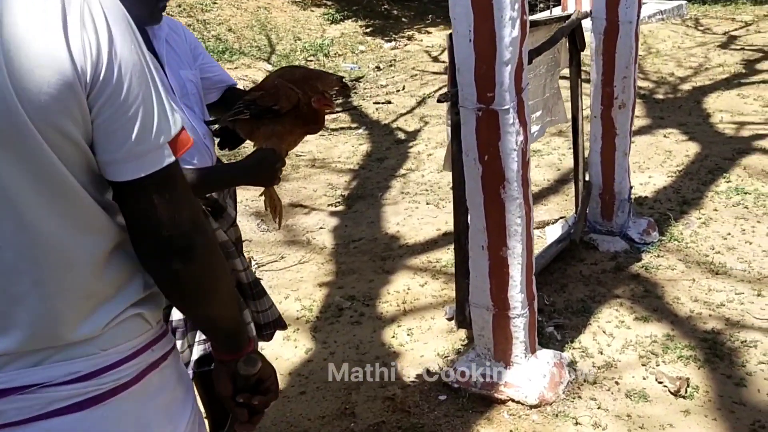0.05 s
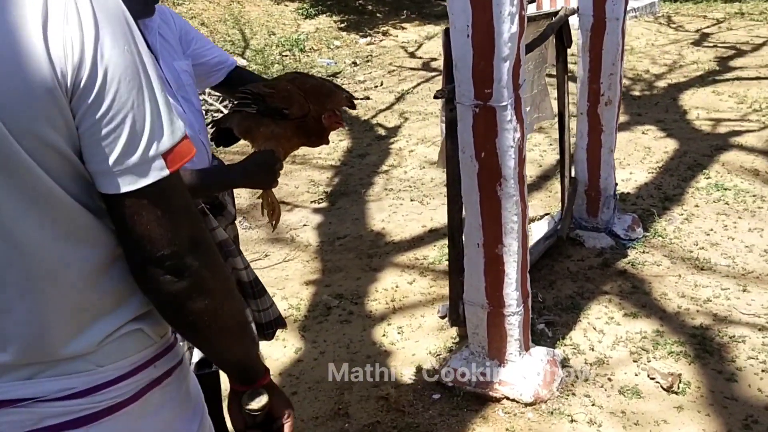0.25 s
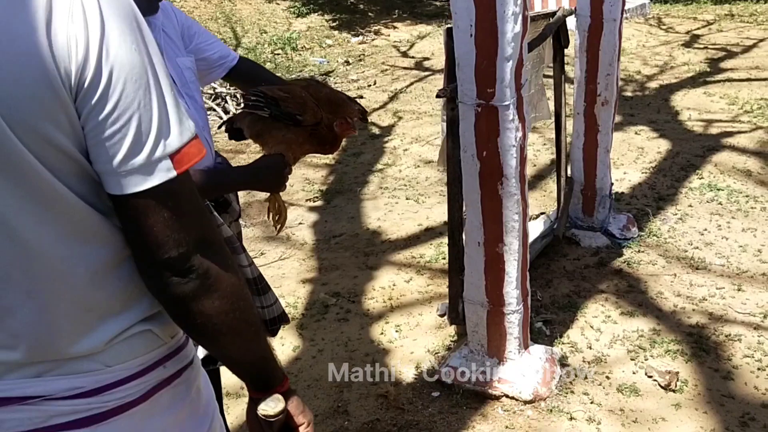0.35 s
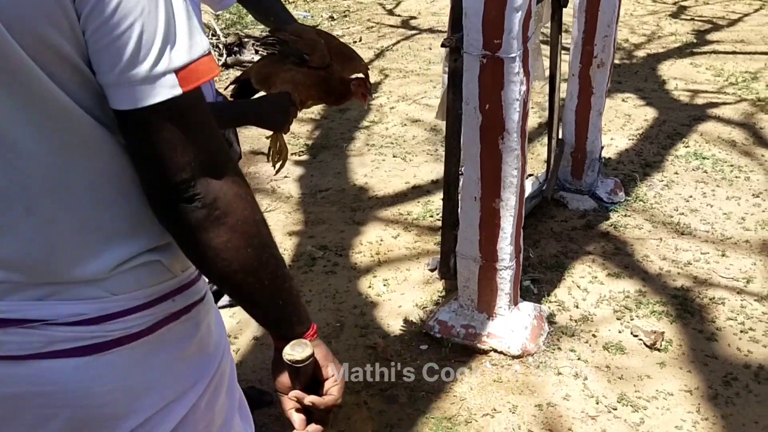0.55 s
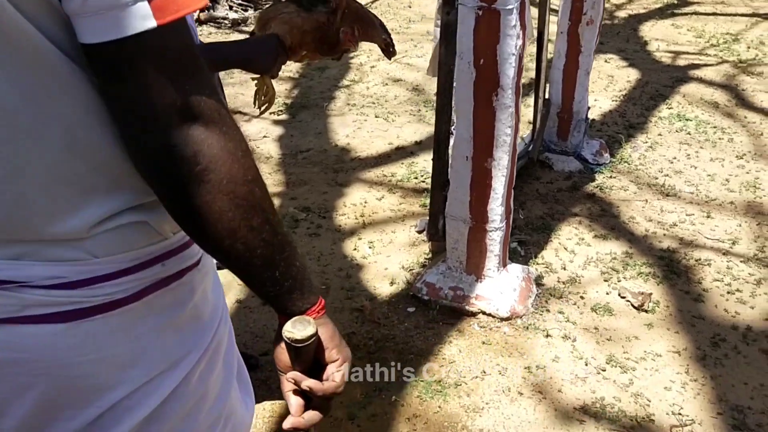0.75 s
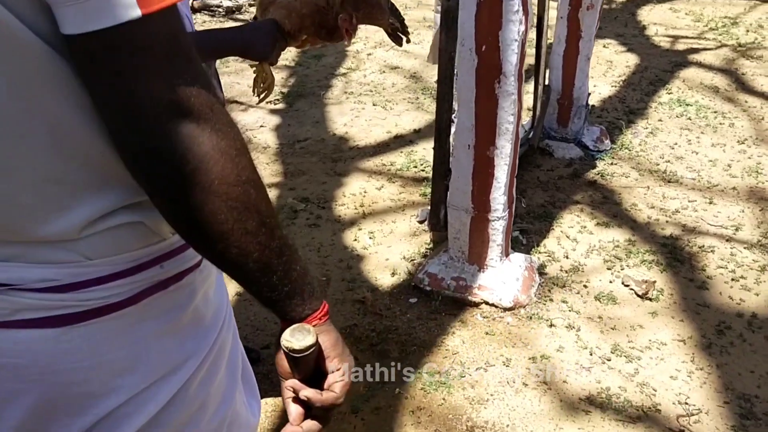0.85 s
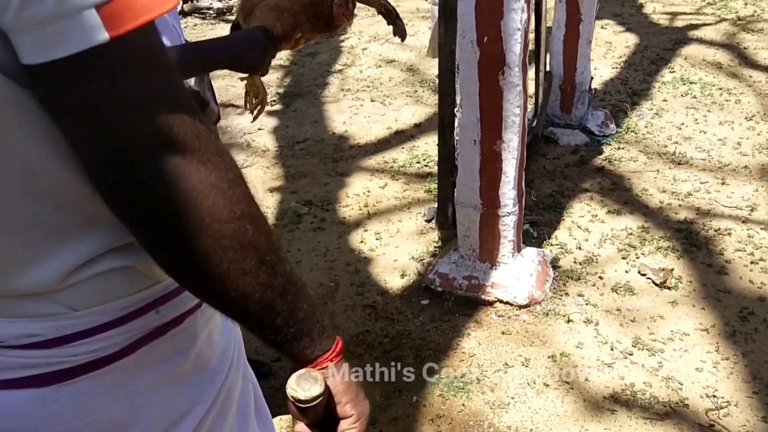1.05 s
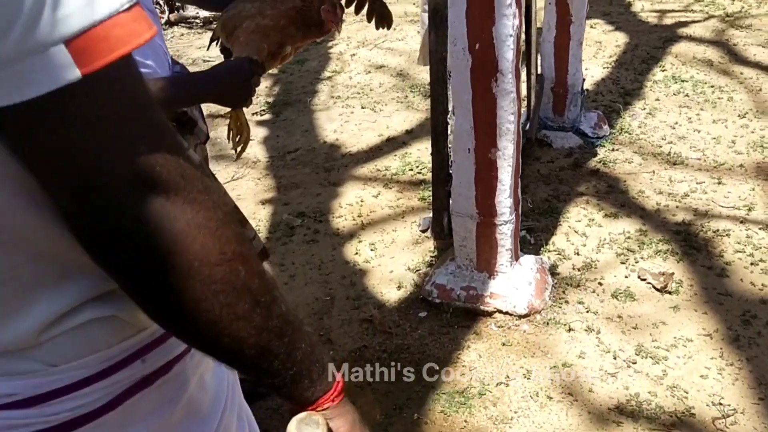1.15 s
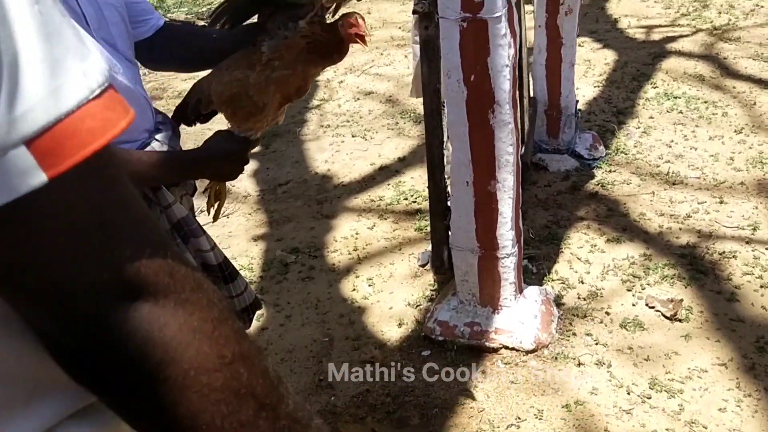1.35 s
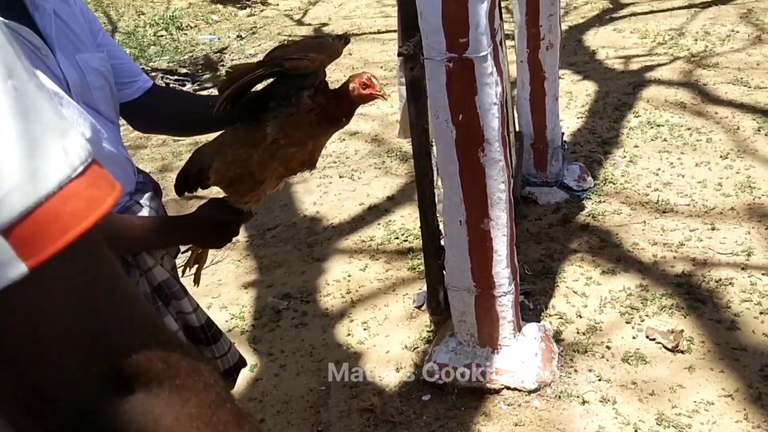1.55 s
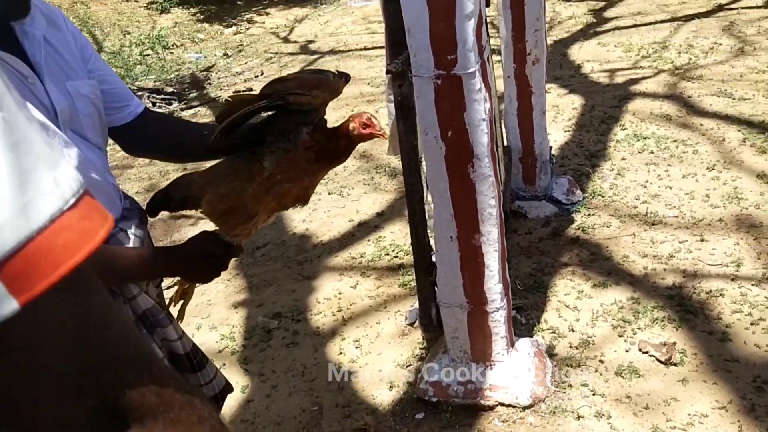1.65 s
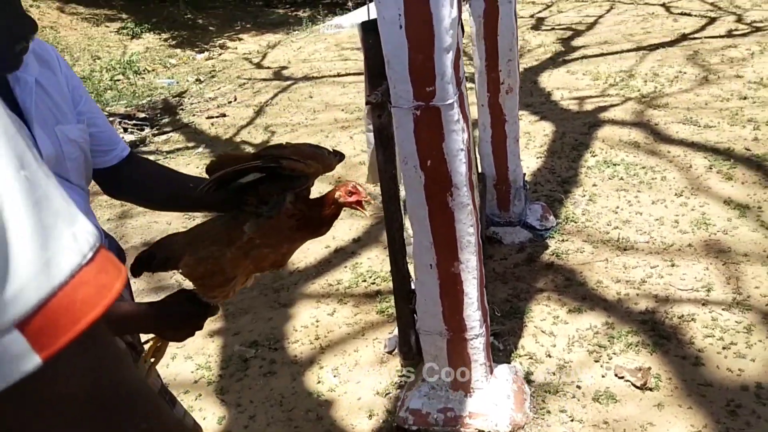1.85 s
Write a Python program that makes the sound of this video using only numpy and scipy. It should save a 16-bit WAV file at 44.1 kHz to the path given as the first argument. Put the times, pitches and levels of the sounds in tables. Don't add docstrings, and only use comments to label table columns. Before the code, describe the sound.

Loud, raspy chicken squawks in quick succession, close up in an open yard with faint echo

```python
import sys
import numpy as np
from scipy import signal
from scipy.fft import rfft, irfft, next_fast_len
from scipy.io import wavfile
from scipy.ndimage import uniform_filter1d

SR = 44100
rng = np.random.default_rng(int(sys.argv[2]) if len(sys.argv) > 2 else 0)


def magnitude_from_level(level_db):
    exponent = np.asarray(level_db, float) / 20
    return 10 ** exponent


def waveform_to_disk(signal):
    frames = np.transpose(np.atleast_2d(signal))
    scaled = np.clip(frames, -1, 1) * 32767
    samples = np.round(scaled).astype(np.int16)
    wavfile.write(sys.argv[1], SR, samples)


N = 83790


def evened(x):
    return x / np.sqrt(np.mean(x ** 2) + 1e-20)


def steady(x):
    return x / np.sqrt(abs(uniform_filter1d(x ** 2, size=1300)) + 1e-12)


def read(points, hz):
    f, value = np.transpose(points)
    return np.interp(np.log(hz + 1), np.log(f + 1), value)


def resonate(x, hz, width):
    turn = np.exp(2j * np.pi * np.cumsum(hz * np.ones(len(x))) / SR)
    r = np.exp(-np.pi * width / SR)
    return 2 * (turn * signal.lfilter([1 - r], [1, -r], x / turn + 1e-18)).real


def resonate_twice(x, hz, width, widen=1):
    return resonate(resonate(x, hz, width), hz, widen * width)


def hush():
    # f/Hz, level/dB per Hz
    hush_spectrum = [(50, -19), (90, -9), (260, -14.5), (666, -6.5), (1300, -7.5), (4300, -13),
                     (5600, -31.5), (15500, -22)]
    # f/Hz, left-right likeness/1
    likeness = [(60, .9), (300, .85), (950, .6), (3800, .2), (15000, .2)]
    frames, hz = N // 256 + 5, np.fft.rfftfreq(1024, 1 / SR)
    a, b, c, d, patches = rng.standard_normal((frames, 513, 5)).T
    patches = uniform_filter1d(patches, size=10, axis=0)
    patches = evened(uniform_filter1d(patches, size=10, axis=1))
    same = np.clip(read(likeness, hz), -1, 1)[:, None]
    left = a + 1j * b
    right = same * left + np.sqrt(1 - same ** 2) * (c + 1j * d)
    z = np.array([left, right]) * magnitude_from_level(read(hush_spectrum, hz)[:, None] + 1.75 * patches)
    return magnitude_from_level(-52.5) * evened(signal.istft(z, nperseg=1024, noverlap=768)[1][:, :N])


def vocal_folds(t, hz, rough, beak, effort_db, wobble, hiss, sizes, octave):
    JITTER, SHIMMER = 0.03647, .45
    TOP_ROUGH = .018
    BLUR_HZ = 151
    BRIGHT_DB, PUFF_DB = 0.89, -5
    SHUT_DB, OPEN_HZ = -0.7, 3000
    OCTAVE_FROM_S, OCTAVE_TO_S, ODD_DB = .245, .305, -20

    wobble = evened(uniform_filter1d(uniform_filter1d(wobble, size=150), size=150))
    turns = np.cumsum(hz * (1 + JITTER * rough * wobble)) / SR
    k = np.arange(1, 24)[:, None]

    blur = rng.standard_normal((len(k), 20000)) + 1j * rng.standard_normal((len(k), 20000))
    poles = np.exp(-2 * np.pi * BLUR_HZ * np.sqrt(k[:, 0] / 2) / SR)
    blur = [(1 - r) ** 1.5 * signal.lfilter([1], [1, -2 * r, r * r], b) for r, b in zip(poles, blur)]
    blur = np.array(blur)[:, -len(t):] * np.sqrt(2)

    broken = np.clip(np.minimum(t - OCTAVE_FROM_S, OCTAVE_TO_S - t) / 0.0037, 0, 1) * octave
    slope_db = BRIGHT_DB * effort_db + SHUT_DB * np.log2(OPEN_HZ / beak)
    sizes_db = ODD_DB * broken * (k % 2) + slope_db * np.log2(k)
    worn = np.minimum(rough + TOP_ROUGH * k, 1)
    phase = 2 * np.pi * (k * turns + rng.random(k.shape))
    partials = (np.sqrt(1 - worn ** 2) + worn * blur) * magnitude_from_level(sizes_db) * np.exp(1j * phase)

    shimmer = 1 + SHIMMER * rough * sizes[turns.astype(int)]
    pulses = partials.real.sum(0) / np.sqrt(len(k) / 2) * shimmer
    return pulses + magnitude_from_level(PUFF_DB + BRIGHT_DB * effort_db) * rough * hiss


def throat_and_beak(drive, beak, effort_db):
    # f/Hz, level/dB
    throat = [(300, -79), (560, -22.5), (1400, -4.5), (3000, 2), (4600, -3.5), (6000, -17), (7400, -15),
              (14000, -50.5)]
    # f/Hz, width/Hz, level/dB
    tract = [(1951, 290, 0.5), (2700, 430, -4.5), (3250, 250, -20.5), (4104, 1160, -10.5)]
    # f/Hz, width/Hz, share/1
    pockets = [(1260, 430, 0.46), (2307, 650, 0.41)]
    BEAK_WIDTH_HZ, BEAK_DB, BEAK_GROWTH = 833, 6.5, 0.33
    SHUT_HZ = 1350

    size = next_fast_len(len(drive) + 2000)
    response = magnitude_from_level(read(throat, np.fft.rfftfreq(size, 1 / SR)))
    body = irfft(rfft(drive, size) * response, size)[:len(drive)]
    for hz, width, db in tract:
        body = body + magnitude_from_level(db) * resonate_twice(drive, hz, width)
    body = body + magnitude_from_level(BEAK_DB + BEAK_GROWTH * effort_db) * resonate_twice(drive, beak, BEAK_WIDTH_HZ)
    opened = np.clip((beak - SHUT_HZ) / 300, 0, 1)
    for hz, width, share in pockets:
        body = body - np.clip(share, 0, 1) * opened * resonate(body, hz, width)
    return steady(body)


def windpipe_whistle(hiss, start_hz, end_hz):
    PIPE_WIDTH_HZ = 48
    PIPE_THROB = 0.13
    tube = np.linspace(start_hz, end_hz, len(hiss))
    whistle = resonate_twice(hiss, tube, PIPE_WIDTH_HZ, 2)
    return (1 - PIPE_THROB) * steady(whistle) + PIPE_THROB * evened(whistle)


def cluck(t, pop):
    u = t / 0.021
    return magnitude_from_level(-35.5) * u * np.exp(1 - u) * evened(resonate_twice(pop, 927, 620))


def squawk(table, pipe, octave=False):
    FULL_DB, PIPE_GROWTH = -13.5, -.25
    s = np.transpose(table)[0]
    t = np.arange(s[0], s[-1] + 0.009124, 1 / SR)
    hz, db, rough, beak = [np.interp(t, s, curve) for curve in np.transpose(table)[1:]]
    rough = np.clip(rough, 0, 1)
    effort_db = np.clip(db - FULL_DB, -25, 5)
    wobble, hiss, sizes, pop = rng.standard_normal((4, 20000))[:, :len(t)]

    drive = vocal_folds(t, hz, rough, beak, effort_db, wobble, hiss, sizes, octave)
    start_hz, end_hz, pipe_db = pipe
    whistle = windpipe_whistle(hiss, start_hz, end_hz)
    voice = throat_and_beak(drive, beak, effort_db)
    voice = voice + magnitude_from_level(pipe_db + PIPE_GROWTH * effort_db) * rough ** 2 * whistle
    fade = np.clip(np.minimum((t - s[0]) / 0.0022, (t[-1] - t) / 0.075), 0, 1)
    return s[0], (voice * magnitude_from_level(db) + cluck(t - s[0], pop)) * fade


def ports(x, tilt, lead):
    size = next_fast_len(len(x) + 400)
    hz = np.fft.rfftfreq(size, 1 / SR)
    half = magnitude_from_level(read(tilt, hz) / 2) * np.exp(.5j * np.interp(hz, *np.transpose(lead)))
    delay = np.exp(-2j * np.pi * hz * 100 / SR)
    return irfft(rfft(x, size) * delay * np.array([half, 1 / half]), size)[:, 100:]


def yard(x):
    # f/Hz, t60/s
    far_t60 = [(300, 0.24), (1300, 0.41), (4000, 0.47), (8000, 0.5), (15000, 0.1)]
    NEAR_T60, NEAR_DB, FAR_DB = 0.059, -7, -23.5
    taps = np.zeros((2, SR))
    at = np.arange(100, SR - 20, 20) + rng.integers(0, 20, (2, (SR - 101) // 20))
    np.put_along_axis(taps, at, rng.choice([-1., 1.], at.shape), 1)
    near = taps * magnitude_from_level(-60 * np.arange(SR) / SR / NEAR_T60)
    hz, t, z = signal.stft(taps, SR, nperseg=256)
    decay = magnitude_from_level(-60 * t / read(far_t60, hz)[:, None])
    far = signal.istft(z * decay, SR, nperseg=256)[1][:, :SR]
    tail = magnitude_from_level(NEAR_DB) * near / np.linalg.norm(near[0]) + magnitude_from_level(FAR_DB) * far / np.linalg.norm(far[0])
    return signal.fftconvolve(x, tail, axes=1)[:, :x.shape[1]]


def hen():
    # t/s, pitch f/Hz, level/dB, roughness/1, beak resonance f/Hz
    squawk_1 = [(0.124, 760, -49, 0.39, 2570), (0.133, 758.3, -34, 0.31, 2830),
                (.185, 803.6, -28, 0.22, 2730), (0.203, 760, -28.5, 0.98, 2850),
                (0.238, 750.5, -22, 1.23, 3000), (0.247, 635, -18.5, 0.03, 2700),
                (0.276, 646.4, -15, 0.04, 2700), (.305, 691.2, -15.5, 0.2, 2980),
                (0.321, 691.7, -14.5, 0.77, 2740), (0.335, 626.3, -17.5, 1, 2840),
                (0.338, 603.4, -14.5, 0.14, 2400), (0.378, 583.2, -14, 0.08, 2160),
                (.386, 587.5, -14, 0.82, 1510), (0.412, 534, -19, 0.93, 1201), (0.433, 586, -32, 0.7, 920)]
    squawk_2 = [(.538, 705, -38.5, 0.61, 2750), (0.564, 697.3, -21.5, 0.913, 2690),
                (.585, 700.1, -19.5, 0.86, 2910), (0.619, 656.2, -18.5, 0.56, 3250),
                (0.634, 681.7, -17.5, 0.57, 3000), (0.681, 680.8, -16, 0.68, 2940),
                (0.705, 688.2, -16, 0.96, 3060), (0.713, 612, -15, 0.17, 3500),
                (0.727, 612.3, -15, 0.041, 3340), (0.733, 653.7, -12, 0.55, 1800),
                (0.75, 617.3, -14, 0.3, 1790), (.762, 582.6, -13.5, .5, 1314), (.774, 525, -18, 0.68, 1020),
                (0.782, 474, -17, 0.37, 1450), (.805, 449, -34, 1, 1500)]
    squawk_3 = [(.912, 700.2, -33, 0.82, 1230), (0.928, 720, -23, 0.93, 1810), (.955, 720, -17, 1, 3000),
                (0.967, 652, -16.5, 0.21, 3250), (1.02, 663.8, -17.5, 0.39, 3000),
                (1.066, 684, -15.5, 0.6, 3200), (1.089, 704, -15, 1, 2700), (1.095, 587, -12.5, 0.69, 2600),
                (1.104, 592, -13, 0.31, 1980), (1.124, 626.5, -13.5, 0.35, 1710),
                (1.129, 607.3, -13.5, 0.79, 1610), (1.149, 568.6, -15.5, 0.96, 1500),
                (1.157, 532.5, -14.5, 0.83, 1020), (1.168, 534, -19.5, 0.77, 1520),
                (1.182, 506, -24, 0.69, 1070)]
    squawk_4 = [(1.304, 720, -34, 1, 2440), (1.32, 720, -23, 0.98, 2480), (1.329, 720, -18, 0.88, 2510),
                (1.382, 672.8, -17, 1, 2674), (1.422, 651.2, -16, 0.66, 2750),
                (1.452, 679.3, -17.5, 0.73, 2980), (1.473, 663.3, -15, 0.98, 2310),
                (1.488, 600.6, -13.5, 0.72, 2180), (1.511, 624, -15, 0.51, 1990),
                (1.518, 630.6, -15, 1, 1420), (1.54, 622.3, -16, 0.67, 1260),
                (1.554, 582, -19.5, 0.59, 1340), (1.576, 526, -62, 0.51, 1210)]
    squawk_5 = [
        (1.872, 760, -39, 0.56, 2490),
        (1.887, 760, -34, 1, 2630),
        (1.96, 730, -1, 1, 2700),
    ]
    # start f/Hz, end f/Hz, level/dB
    windpipe = [
        (749, 773, -11.5),
        (753, 852, -7.5),
        (760, 771, -12),
        (797, 639, -10),
        (720, 550, -19),
    ]
    # f/Hz, left-right level/dB
    tilt_1 = [(640, -5), (1000, -1.5), (1500, -8), (2300, -1.5), (3200, 16.5), (5500, 1.5), (8500, -28),
              (14000, -18.5)]
    tilt_2 = [(640, -2), (1000, -5), (1500, -16.5), (2300, 3.5), (3200, 15), (5500, -2), (8500, -22),
              (14000, -17)]
    tilt_3 = [(640, 2), (1000, -7), (1500, -11), (2300, 4.5), (3200, 18), (5500, -1), (8500, -17.5),
              (14000, -24)]
    tilt_4 = [(640, -3.5), (1000, -6.5), (1500, -18), (2300, 3.5), (3200, 14), (5500, -3.5), (8500, -25.5),
              (14000, -19)]
    # f/Hz, phase/rad
    lead_1 = [(0, 0), (1980, -0.4), (6200, -9.1), (6890, -9.1), (10800, -40.8), (12700, -42.0),
              (15300, -26.6)]
    lead_2 = [(0, 0), (1460, -2.3), (3450, -9.8), (7920, -16.8), (9390, -25.9), (12100, -50.2),
              (15300, -69.9)]
    lead_3 = [(0, 0), (2670, -2.0), (6720, -10.0), (9650, -24.9), (11600, -28.5), (12500, -29.2),
              (15300, -17.8)]
    lead_4 = [(0, 0), (1890, -2.1), (2760, -8.6), (4130, -11.0), (5600, -13.9), (13300, -24.4),
              (15300, -26.1)]
    EARLIER_S, LEAD_S = -.87, .5
    LIMIT, CUT_HZ = .95, 380

    out = np.zeros((2, N + SR))
    tables = [squawk_1, squawk_2, squawk_3, squawk_4, squawk_5]
    tilts = [tilt_1, tilt_2, tilt_3, tilt_4, tilt_4]
    leads = [lead_1, lead_2, lead_3, lead_4, lead_4]
    for k, (table, pipe, tilt, lead) in enumerate(zip(tables, windpipe, tilts, leads)):
        start, voice = squawk(table, pipe, octave=k == 0)
        pair = ports(voice, tilt, lead)
        for shift in [0, EARLIER_S] if k == 1 else [0]:
            at = round((start + shift + LEAD_S) * SR)
            out[:, at:at + pair.shape[1]] += pair
    out = LIMIT * np.tanh((out + yard(out)) / LIMIT)
    out = signal.sosfilt(signal.butter(4, CUT_HZ, "high", fs=SR, output="sos"), out)
    return out[:, round(LEAD_S * SR):][:, :N]


def rustle():
    # t/s, half length/s, f/Hz, level/dB
    bursts = [
        (1.233, 0.0093, 6980, -57.5),
        (1.288, 0.0037, 7070, -92),
        (1.771, 0.05, 8840, -60),
        (0.431, 0.0075, 286, -49),
        (0.55, 0.013, 261, -50),
        (1.317, 0.0053, 276, -51),
    ]
    t, out = np.arange(N) / SR, np.zeros((2, N))
    for s, half, hz, db in bursts:
        width = 0.11 * hz * half / 0.0064
        noise = rng.standard_normal((3, N))
        noise = noise[:2] + 2 * noise[2]
        puff = evened(np.array([resonate_twice(n, hz, width, 2) for n in noise]))
        out += magnitude_from_level(db) * np.exp(-((t - s) / half) ** 2) * puff
    return out


def far_bird():
    # t/s, pitch f/Hz, level/dB
    drone = [
        (1.559, 628, -32),
        (1.62, 643, -35.5),
        (1.699, 652.5, -36),
        (1.749, 647.5, -39.5),
        (1.81, 633, -38.5),
        (1.859, 635, -43),
    ]
    # multiple of pitch/1, level/dB
    drone_partials = [(1, -24.5), (2, -10), (3, -23), (3.5, -17.5), (3.8, -17), (6, -23.5), (7, -27)]
    WIDTH_HZ = 22
    s, pitch, db = np.transpose(drone)
    t = np.arange(N) / SR
    hz = np.interp(t, s, pitch)
    noise = rng.standard_normal((3, N))
    noise = noise[:2] + 0.22 * noise[2]
    note = np.zeros((2, N))
    for k, p_db in drone_partials:
        note += magnitude_from_level(p_db) * np.array([steady(resonate_twice(n, k * hz, WIDTH_HZ * k, 2)) for n in noise])
    return note * magnitude_from_level(np.interp(t, s, db, -120, -120))


def scene():
    return hush() + hen() + rustle() + far_bird()


def top_cut(x):
    return signal.sosfilt(signal.butter(12, 15720, fs=SR, output="sos"), x)


def record(dry):
    mix = signal.oaconvolve(dry, signal.firwin(101, 15300, fs=SR)[None], "same")
    return top_cut(mix)


dry = scene()
out = record(dry)
waveform_to_disk(out)
```